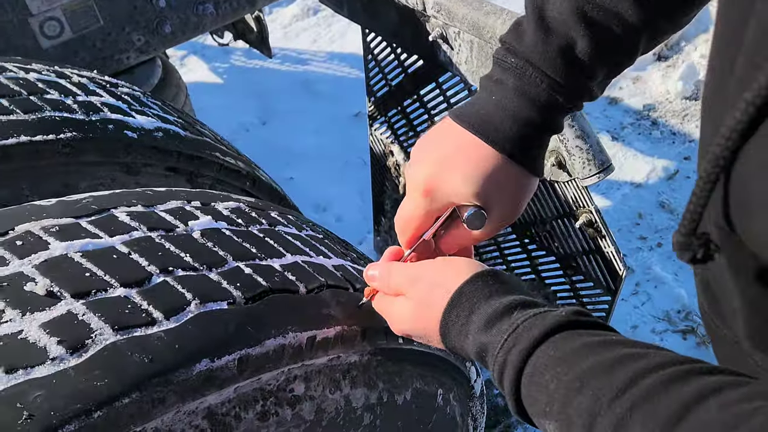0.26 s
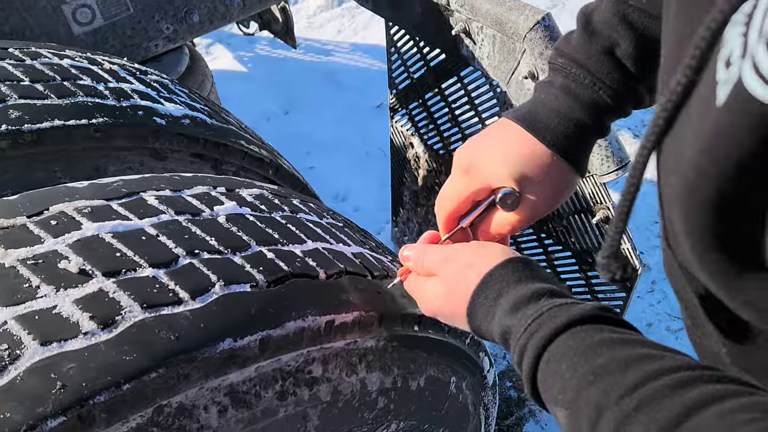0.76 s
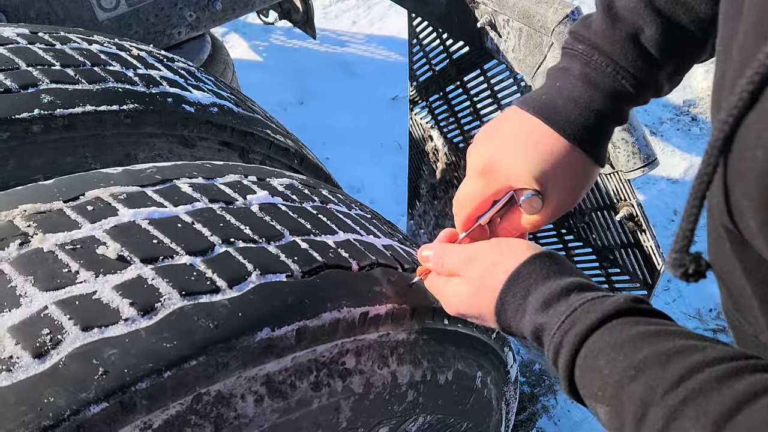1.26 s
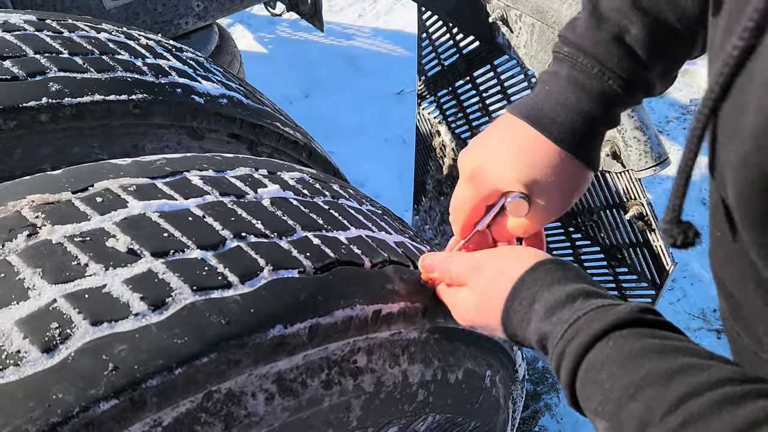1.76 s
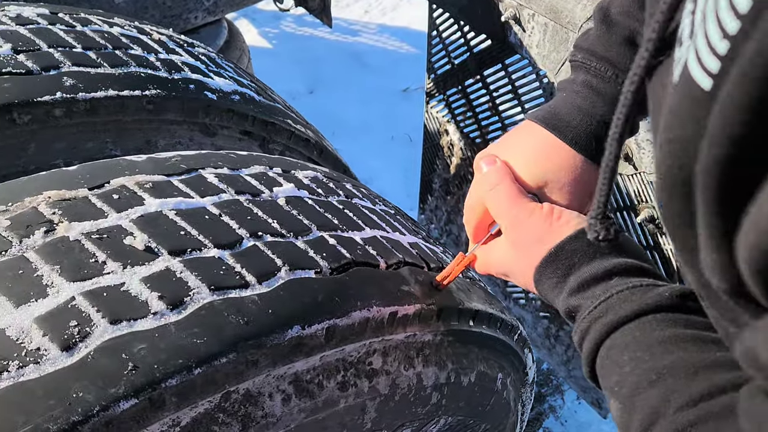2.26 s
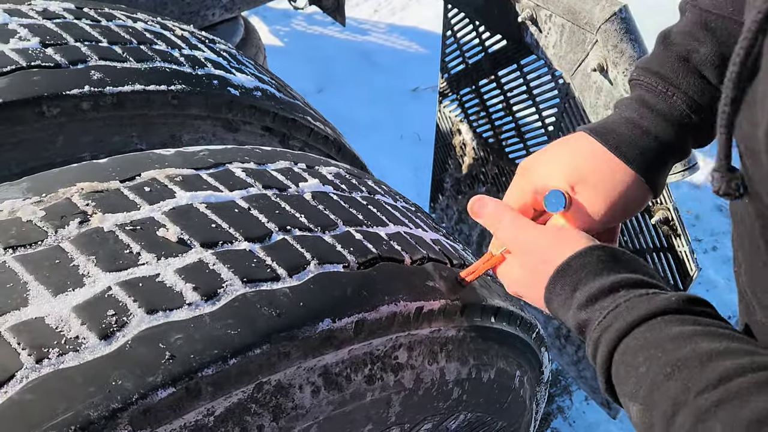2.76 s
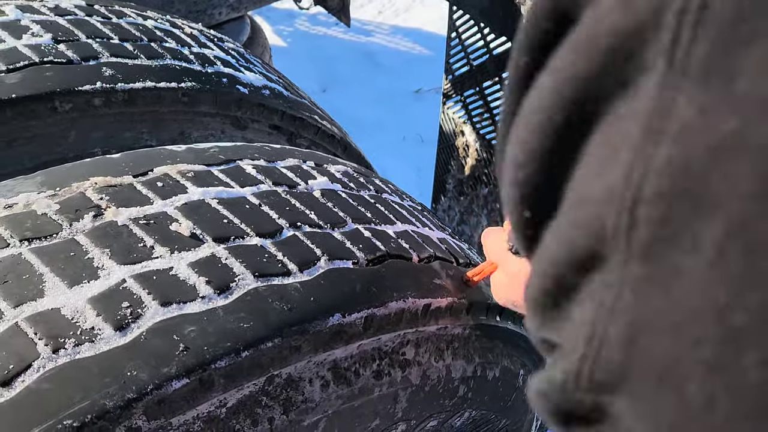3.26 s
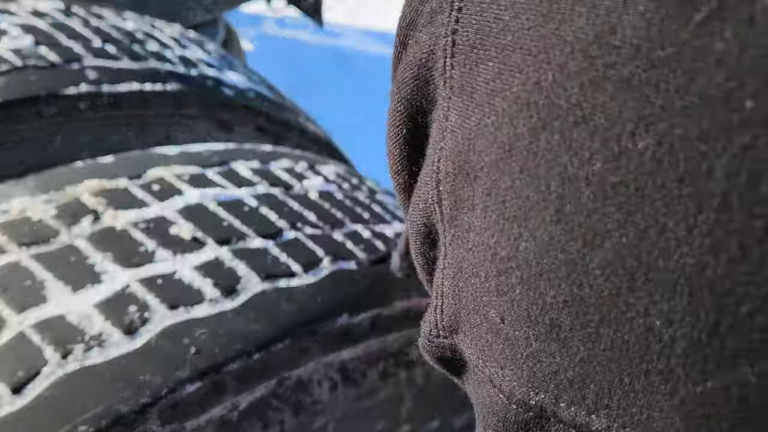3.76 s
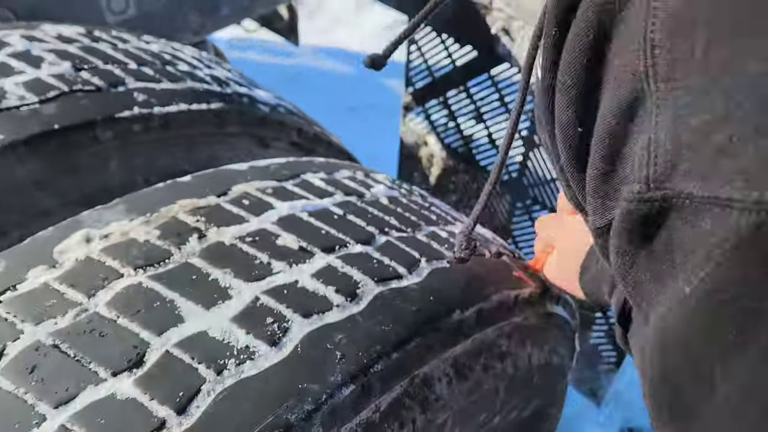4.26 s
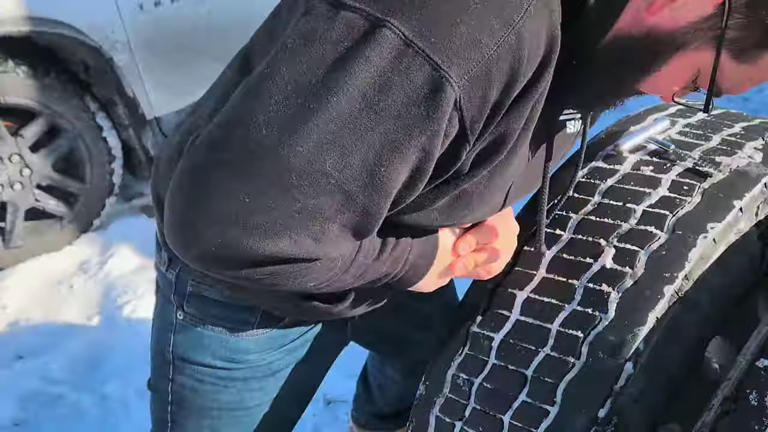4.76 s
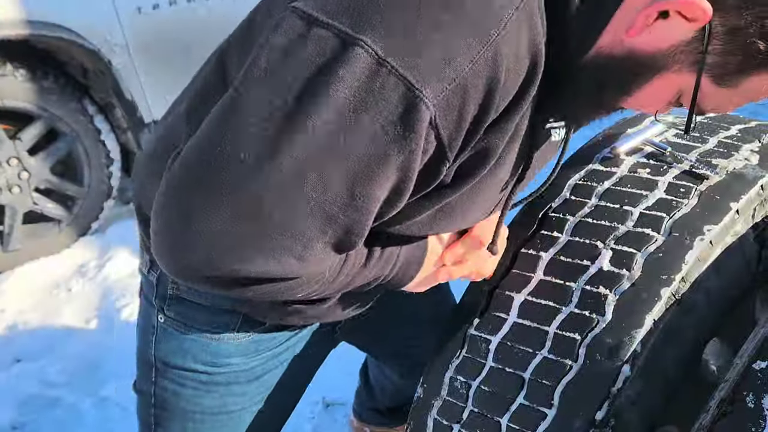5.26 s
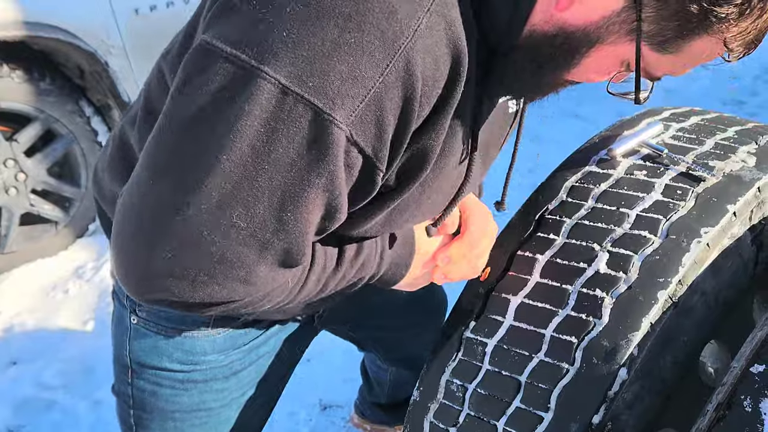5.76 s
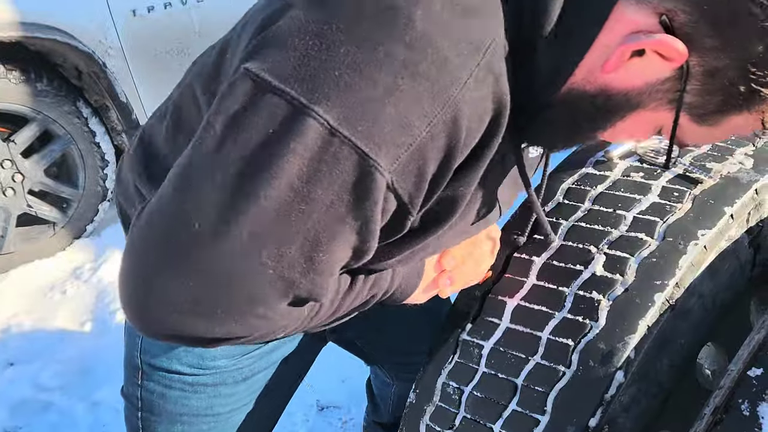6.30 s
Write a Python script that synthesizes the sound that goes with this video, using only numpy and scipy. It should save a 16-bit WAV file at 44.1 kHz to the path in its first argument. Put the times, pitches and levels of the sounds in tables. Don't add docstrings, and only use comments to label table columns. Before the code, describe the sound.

Outdoors, a close, fluctuating tire leak hisses through buffeting wind, fades to nearly nothing, and ends with faint spits, rubbery creaks and sleeve rustle.

```python
import sys
import numpy as np
from scipy import signal
from scipy.fft import rfft, irfft, next_fast_len
from scipy.io import wavfile
from scipy.ndimage import uniform_filter1d, map_coordinates

SR = 44100
rng = np.random.default_rng(int(sys.argv[2]) if len(sys.argv) > 2 else 0)


def field_ratio(decibels):
    return 10 ** (np.asarray(decibels, dtype=float) / 20)


def generate_wav(signal):
    frames = np.transpose(np.atleast_2d(signal))
    scaled = np.clip(frames, -1, 1) * 32767
    pcm = np.round(scaled).astype(np.int16)
    wavfile.write(sys.argv[1], SR, pcm)


N = 288052
TIME = np.arange(N) / SR

# (frequency [Hz], level [dB])
NEAR_RIGHT = [(1000, -1.2), (5000, -1.5), (8000, -9), (12000, -16)]


def unit(x):
    return x / np.sqrt(np.mean(x ** 2) + 1e-20)


def along(points, hz):
    f, v = np.transpose(points)
    return np.interp(np.log(hz + 1), np.log(f + 1), v)


def hump(hz, centre_hz, octaves):
    return np.exp(-(np.log2((hz + 1) / centre_hz) / octaves) ** 2)


def curves(rows):
    s, *cols = np.transpose(rows)
    return [np.interp(TIME, s, c) for c in cols]


def wobble(rate):
    knots = rng.standard_normal(int(N * rate / SR) + 4)
    return map_coordinates(knots, [TIME * rate])


def fade(s):
    return np.clip((TIME - s) / .2 + .5, 0, 1)


def bumps(times, lengths, power):
    distance = np.abs(2 * (TIME - times[:, None]) / lengths[:, None])
    return np.exp(-np.minimum(distance, 3) ** power)


def swells(rows, power):
    s, length, db = np.transpose(rows)
    return db @ bumps(s, length, power)


def add(out, s, piece):
    out[round(s * SR):][:len(piece)] += piece


def filtered(x, response):
    m = next_fast_len(N + 8192)
    return irfft(rfft(x, m) * response(np.fft.rfftfreq(m, 1 / SR)), m)[..., :N]


def rush(spectrum, alike, patchy_db):
    z = signal.stft(rng.standard_normal((2, N)), nperseg=512)[2]
    field = uniform_filter1d(rng.standard_normal(z.shape[1:]), size=5, axis=0)
    field = uniform_filter1d(field, size=12, axis=1)
    pair = signal.istft(z * field_ratio(patchy_db * unit(field)), nperseg=512)[1][:, :N]
    turn = lambda hz: np.arccos(np.clip(along(alike, hz), -1, 1)) / 2
    mid, side = filtered(pair, lambda hz: field_ratio(along(spectrum, hz)) * [np.cos(turn(hz)), np.sin(turn(hz))])
    return unit(np.array([mid + side, mid - side]))


def panned(x, lead_db):
    left, right = field_ratio(lead_db / 2), field_ratio(-lead_db / 2)
    y = x * np.array([left, right]) / np.sqrt(left ** 2 + right ** 2)
    return y / np.sqrt(np.mean(y.mean(0) ** 2))


def jet():
    # (time [s], air flow [dB], slack of the rubber [dB], left lead of the treble [dB])
    gap = [(0, -20.5, -15.5, 6.5), (.6, -23, -9, 11), (.74, -22.5, -16, 11), (1.06, -19, -15.5, 8.5),
           (1.42, -21, -14.5, 9), (1.62, -16.5, -23, 8.5), (1.85, -28, -16.5, 14), (2.25, -25.5, -22.5, 20),
           (2.45, -34.5, -14.5, 23.5), (2.8, -24.5, -14, 8.5), (3.25, -32, 1.5, 24), (3.48, -34, -4, 23.5),
           (4.15, -33.5, -11, 20.5), (4.32, -25.5, -14, 14), (4.55, -31, -10.5, 14),
           (4.72, -38.5, -8, 15.5), (5.26, -48.5, -19.5, 10.5), (5.44, -95, -9, 19.5)]
    # (time [s],
    # length [s], depth [dB])
    pinches = [(.41, .06, 2), (.47, 0.095, 6), (.665, .04, 1), (.71, 0.12, 0), (1.114, 0.078, 4.5),
               (1.46, 0.038, 1), (1.515, 0.095, 8.5), (1.91, .06, -1), (2.36, 0.14, 5.5), (2.5, 0.065, 1.5),
               (2.63, 0.1, -3.5), (2.93, 0.084, 3), (3.17, 0.071, -0.5), (3.5, 0.25, 2.5),
               (3.745, 0.032, 11), (4.04, 0.04, -2.5), (4.19, 0.098, 1.5), (4.76, 0.14, 5), (5.0, .07, 5.5),
               (5.033, 0.023, 17), (5.11, .12, -1.5)]
    # (time [s], length [s],
    # gain [dB])
    spurts = [(.22, .1, 3), (.35, 0.14, 3), (.544, 0.034, 6.5), (.617, 0.013, 7), (.852, 0.054, 10),
              (1.165, 0.068, 4), (1.3, 0.29, 6.5), (1.84, 0.1, 4), (2.04, 0.12, 5), (2.38, 0.14, 6.5),
              (2.547, 0.013, 7.5), (3.0, 0.29, 4.5), (3.033, 0.063, 6), (3.4, 0.14, 4), (3.6, 0.046, -1.5),
              (3.68, 0.045, 2), (3.79, 0.038, 2), (3.86, 0.21, 8.5), (4.02, .05, -0.5), (4.12, .04, 1.5),
              (4.43, .15, -0.5), (4.54, .1, 2.5), (4.65, 0.094, -3.5)]
    # (level over the flow [dB], share of slack, share of a pinch, share of a spurt,
    # extra while fingers cup the hole [dB])
    zones = [
        (0.5, 0.022, 0.75, 0.14, -0.5),
        (-4.5, 0.077, 0.82, 0.38, 4.5),
        (-3.5, 0.43, 0.56, 0.52, 3),
        (0, 1, 0.13, 0.83, -0.5),
    ]
    # (frequency [Hz], level per Hz [dB])
    fizz = [(5600, -33), (9500, -6), (10900, -3), (11800, 2), (12800, 5), (13700, -1.5), (14800, 6),
            (15700, 2), (17000, -2.5)]
    whistle = [(3060, -29), (5200, -19), (5530, -6), (5970, -5), (7420, 2), (9730, -5.5), (10500, -9.5),
               (13600, -35), (22000, -120)]
    body = [(1410, -25), (2400, -7.5), (4050, -0.5), (5040, -2.5), (5530, -3), (5800, -8), (7540, -19),
            (12800, -120)]
    rasp = [(260, -6.5), (450, -10), (572, -3), (931, 1.5), (1110, -3), (1420, 0.5), (1810, -1), (2700, -2),
            (3700, -21), (5940, -120)]
    # (frequency [Hz], left-right likeness)
    alike = [(500, .9), (900, .94), (2000, .86), (4000, .72), (7000, .55), (15000, .55)]
    # (frequency [Hz], level [dB])
    side_on = [(1500, -4), (3000, -1), (5500, -0.5), (6500, -6.5), (7800, -1), (10000, 1), (12500, -1),
               (13800, -1), (15000, 2), (15800, -4)]

    flow_db, slack_db, lead_db = curves(gap)
    flow = field_ratio(flow_db) + field_ratio(1.3 * wobble(35)) * leaks()
    cupped = 1 - fade(1.47)
    pinch_db, spurt_db = swells(pinches, power=3.1), swells(spurts, power=2.34)
    sputter = 0.75 * wobble(9) + 0.82 * wobble(45)
    textures = [(fizz, 1.05, .7), (whistle, .8, .8), (body, .6, .9), (rasp, .15, 1.1)]
    air = 0
    for (db, slack, pinch, spurt, cup_db), (shape, shade, shake_db) in zip(zones, textures):
        opening_db = slack * slack_db - pinch * pinch_db + spurt * spurt_db
        gain = flow * field_ratio(db + opening_db + cup_db * cupped)
        shake = field_ratio(shake_db * sputter + 0.62 * wobble(14))
        air = air + gain * shake * panned(rush(shape, alike, patchy_db=1.4), shade * lead_db)
    air = hands(air)
    turned = fade(4.62)
    return (1 - turned) * air + turned * filtered(air, lambda hz: field_ratio(along(side_on, hz)))


def hands(x):
    # (from [s], left port ahead [rad], cupped-hand resonance [Hz], its level [dB],
    # hollow near 10 kHz [dB])
    postures = [(0, 1.45, 2030, 3, -0.5), (0.651, 1.87, 1480, 2.5, -4), (1.1, 1.15, 3050, 1.5, -5),
                (1.55, 1.06, 2070, -1, -2.5), (1.85, 2.2, 2090, -1.6, -0.5), (2.3, 1.6, 640, 6.5, 4),
                (2.98, 0.91, 1310, 2.5, 4), (3.42, 4.3, 790, 0.5, -4), (3.97, 3.6, 876, 5.5, -8.5),
                (4.22, 0.67, 2110, 4.5, -1.5), (4.6, 0.2, 700, 2.5, -6.5), (5.0, .4, 700, -3, -6)]
    notch_db = [-2.5, -6.5, -3, -3, -5, -5, -3, -1, -3, -3.5, -3, -6]
    # (resonance [Hz], its level [dB], near 14 kHz [dB], near
    # 15 kHz [dB], top edge near 16 kHz [dB])
    treble_rows = [(11500, 0, 3, -0.5, 1), (11700, 2.5, 2, 2, 2.5), (7600, 1.5, -2, 0.8, .3),
                   (7000, 2, -4, -3.5, -4), (7900, 0.5, 1, -2, -11), (5960, 1, 3, -0.5, -3),
                   (7600, 1.5, 1.5, 2, -2.5), (5100, 2, 4, -1, -6), (5400, 5, 6, -3, 1), (5500, 2, 4, 2, 4),
                   (6160, 5.5, 4, -1, 4), (8000, 4.5, 3, -1.5, -1.5)]
    # (band centre [Hz], its level [dB], near 12.5
    # kHz [dB], near 6.5 kHz [dB], near 2 kHz [dB])
    right_rows = [(8000, -1.5, 2, -0.5, .3), (9500, -5.5, -2.5, -4.5, -0.3), (9000, 1, 1.5, -1.8, -2.3),
                  (8250, -6, -1.5, -6, -1), (15200, -5, 1, 6, 6), (11000, -3, 2, 3, 2.5),
                  (11040, -2, 8, 2.5, -5), (11000, -7, 5, -3, -8), (11000, -3, 5, .3, -4),
                  (8600, 5, 3, -5, -0.5), (8000, 2.5, 4, -4, -4), (10000, -5.5, 0.5, 0, 1)]

    starts, ahead, cup_hz, cup_db, hollow_db = np.transpose(postures)[..., None, None]
    peak_hz, peak_db, fourteen_db, crest_db, edge_db = np.transpose(treble_rows)[..., None, None]
    right_hz, right_db, high_db, middle_db, low_db = np.transpose(right_rows)[..., None, None]
    notch = np.reshape(notch_db, cup_db.shape)
    late = rng.uniform(.00015, .0022, (3, len(postures), 2, 1))
    size = rng.choice([-1, 1], late.shape) * field_ratio(-19 + np.array([[0], [5]]))
    left_first, right = np.array([[1], [-1]]), np.array([[0], [1]])

    def response(hz):
        echoes = 1 + (size * np.exp(-2j * np.pi * hz * late)).sum(0)
        first = np.exp(.5j * ahead * hz / (hz + 1400) * left_first)
        colour = cup_db * hump(hz, cup_hz, octaves=0.58)
        colour = colour + hollow_db * hump(hz, 10100, octaves=0.35)
        colour = colour + notch * hump(hz, 2520, octaves=0.12)
        fine_colour = peak_db * hump(hz, peak_hz, octaves=.14)
        fine_colour = fine_colour + fourteen_db * hump(hz, 13900, octaves=.05)
        fine_colour = fine_colour + crest_db * hump(hz, 14900, octaves=.05)
        fine_colour = fine_colour + edge_db * hump(hz, 15900, octaves=.04)
        right_colour = right_db * hump(hz, right_hz, octaves=0.21)
        right_colour = right_colour + high_db * hump(hz, 12400, octaves=0.14)
        right_colour = right_colour + middle_db * hump(hz, 6500, octaves=.3)
        right_colour = right_colour + low_db * hump(hz, 2000, octaves=0.457)
        right_colour = right_colour - 3.5 * hump(hz, 3600, octaves=0.119)
        right_colour = right_colour + 2.5 * hump(hz, 11900, octaves=.05)
        right_colour = right_colour - 2.5 * hump(hz, 15600, octaves=.07)
        return echoes * first * field_ratio(colour + fine_colour + right * right_colour)

    heard = filtered(x, response)
    begun = [np.ones(N)] + [fade(s) for s in starts.ravel()[1:]] + [np.zeros(N)]
    return sum((begun[k] - begun[k + 1]) * y for k, y in enumerate(heard))


def wind():
    # (time [s], buffet level [dB], flutter level [dB], left lead [dB])
    strength = [(0, -22, -33, 0), (.6, -26.5, -35.5, 3.5), (.78, -23, -33, -7), (1.3, -26.5, -42.5, -4),
                (1.75, -26, -45, -6), (2.4, -26, -37.5, -7.5), (2.6, -35.5, -38.5, -6.5),
                (3.4, -35, -37.5, 0.5), (3.95, -34, -45, -11), (4.55, -27.5, -35, -1.5),
                (4.8, -40.5, -45, 0.5), (5.5, -40, -47, -1), (5.9, -43.5, -49.5, -1), (6.1, -34.5, -40, -1),
                (6.53, -28.5, -44.5, -0.5)]
    # (time [s], length [s], gain [dB])
    gusts = [(.16, 0.14, -5), (.3, 0.057, -2), (.39, 0.12, -8), (.7, 0.15, -10.5), (.8, .07, 1.5),
             (1.11, 0.022, 10.5), (1.33, 0.15, -3.5), (1.45, 0.11, 7.5), (1.6, 0.033, 10),
             (1.72, 0.089, -6), (1.843, 0.062, 9), (2.065, 0.048, -16), (2.115, 0.028, 10),
             (2.17, 0.031, -14), (2.333, 0.033, 18.5), (2.48, 0.054, 9), (2.95, 0.31, 7), (3.45, 0.046, -3),
             (3.55, 0.3, 7.5), (3.71, 0.042, 5), (3.88, 0.02, 11.5), (4.175, 0.08, 6.5), (4.3, 0.28, -8),
             (4.55, .12, 0), (5.15, 0.11, 3.5), (5.33, 0.23, -8), (5.99, 0.049, 12), (6.185, 0.14, -8.5),
             (6.33, 0.11, 0), (6.44, .08, -4.5)]
    # (frequency [Hz], level per Hz [dB])
    slow = [(11, -41.5), (18, -10), (43, 1), (64, 2.5), (82, -1), (180, -18), (230, -44.5), (400, -120)]
    quick = [(65, -41.5), (110, -1.5), (205, -9.5), (439, -20.5), (600, -29), (780, -34.5), (1320, -120)]

    buffet_db, flutter_db, lead_db = curves(strength)
    gust_db = swells(gusts, power=2.0)
    lumps = field_ratio(1.6 * wobble(22.095))
    eddies = rush(slow, [(40, 0.93), (90, 1.0), (160, 0.362)], patchy_db=1.5)
    buffet = panned(lumps * eddies, lead_db)
    lumps = field_ratio(1.8 * np.array([wobble(30), wobble(30)]))
    flutter = panned(lumps * rush(quick, [(130, 0.42), (300, 0.2)], patchy_db=2.0), .7 * lead_db)
    steady = field_ratio(buffet_db + gust_db) * buffet + field_ratio(flutter_db + 0.6 * gust_db) * flutter
    thumps, lull = hard_gusts()
    return lull * steady + thumps


def hard_gusts():
    # (time [s], peak [dB], pitch [Hz], length [cycles])
    gust_rows = [(0.495, -16, 54.6, 1.1), (0.785, -16, 55, 0.37), (2.333, -13, 65, 0.84),
                 (2.332, -17, 207, 0.62), (3.61, -18.5, 200, 0.57), (2.693, -17.5, 88.5, 0.34),
                 (4.18, -16, 59, 0.66), (4.512, -13, 65, 0.64), (4.572, -15, 55, 0.97),
                 (6.362, -14, 64, 1.04), (0.279, -24.5, 148, 1.6), (0.619, -17.5, 191, .9),
                 (0.861, -14.5, 160, 0.71), (1.31, -25, 180, 0.67), (4.555, -27, 210, 1.3),
                 (4.621, -31.5, 260, 2.1), (4.656, -33, 230, 2.1), (4.669, -33, 300, 1), (5.18, -28, 60, 1),
                 (6.221, -31, 260, 1.3), (6.291, -32, 300, 1.1), (6.518, -31, 230, 1.3)]
    thumps = np.zeros(N)
    for s, db, hz, cycles in gust_rows:
        swell = np.exp(-((TIME - s) * hz / cycles) ** 2 * 2)
        thumps += field_ratio(db - 3.0) * swell * np.sin(2 * np.pi * hz * (s - TIME) + 1.4)
    s, _, hz, cycles = np.transpose(gust_rows)
    lull = 1 - 0.5 * bumps(s, 1.27 * cycles / hz, power=4.7).max(0)
    return thumps * field_ratio([[-.7], [.6]]), lull


def yard():
    # (frequency [Hz], level per Hz [dB])
    spectrum = [(240, -44.5), (400, -18.5), (800, -12), (1300, -17.5), (2250, -17.5), (2450, -30),
                (2900, -29), (3300, -25.5), (5000, -28.5), (6500, -28), (8000, -32.5), (9500, -46),
                (15800, -64)]
    # (frequency [Hz], level [dB])
    facing_away = [(1000, 3.2), (4000, 3.5), (7000, -3), (9000, -8.5), (15800, -10)]
    air = rush(spectrum, [(600, 0.18), (3000, .3), (8000, .15)], patchy_db=2.5)
    hum = field_ratio(-59.5 + 0.27 * wobble(2.1)) * panned(air, np.full(N, 1.5))
    hum[1] = filtered(hum[1], lambda hz: field_ratio(along(facing_away, hz)))
    return hum


def gap_clicks():
    # (time [s], peak [dB])
    snaps = [
        (2.552, -25),
        (5.0183, -32),
        (5.0453, -35),
        (5.686, -43),
        (5.8555, -36),
        (6.02, -39),
        (6.082, -46),
    ]
    out, t = np.zeros(N + SR), TIME[:SR // 20]
    for s, db in snaps:
        add(out, s, field_ratio(db - 60 * t / .006) * uniform_filter1d(rng.standard_normal(len(t)), size=3))
    return out[:N]


def creaks():
    # (time [s], peak [dB], pitch [Hz], time to fall 60 dB [s], snap [dB])
    creak_rows = [(3.762, -27.5, 780, 0.03, -10), (4.485, -27, 1450, .012, -10),
                  (4.499, -31, 600, 0.0078, -12), (4.537, -26.5, 810, 0.02, -9),
                  (4.584, -22, 960, 0.0098, -8), (4.638, -33, 564, 0.021, -15),
                  (4.648, -45, 600, 0.012, -15), (4.661, -36, 660, 0.016, -15),
                  (4.672, -35, 700, 0.014, -15), (4.707, -40, 527, 0.045, -6),
                  (4.717, -38.5, 705, 0.013, 2), (4.758, -42, 568, 0.023, -6),
                  (5.681, -41, 560, 0.022, -18), (5.897, -41.5, 880, 0.024, -9),
                  (6.217, -43, 554, 0.018, -30), (6.273, -41, 1700, 0.011, -20),
                  (6.29, -38, 900, 0.011, -25), (6.304, -43, 940, 0.02, -22),
                  (6.343, -35.5, 676, 0.022, -29), (6.381, -35, 815, 0.023, -28),
                  (6.391, -35, 800, 0.03, -31), (6.397, -38, 1000, 0.014, -24),
                  (6.415, -27.5, 725, 0.019, -35), (6.435, -41.5, 1400, 0.013, -21),
                  (6.452, -42, 1100, .012, -18), (6.469, -35, 1900, .01, -18), (6.475, -42, 1500, .01, -16),
                  (6.48, -29.5, 910, 0.019, -20), (6.489, -36, 804, 0.016, -22),
                  (6.497, -41, 1100, .015, -16), (6.503, -42, 900, .012, -16),
                  (6.519, -45, 977, 0.018, -14)]
    # (from [s], to [s], rate [grains/s], level [dB])
    scrapes = [
        (4.478, 4.787, 130, -52),
        (5.86, 5.95, 130, -51),
        (6.22, 6.331, 600, -50),
        (6.332, 6.529, 1000, -48),
    ]
    out, t = np.zeros(N + SR), TIME[:SR // 20]
    slips = list(creak_rows)
    for start, end, rate, db in scrapes:
        for a, b, c in rng.random((int((end - start) * rate), 3)):
            pitch_hz = 620 * 3.5 ** (c * c)
            slips.append((start + a * (end - start), db + 12 * (b - .5), pitch_hz, .012, -24))
    for s, db, hz, t60, snap_db in slips:
        drift = np.cumsum(rng.standard_normal(len(t))) * 0.14
        phase = 2 * np.pi * hz * t + drift
        ring = sum(field_ratio(level) * np.sin(k * phase) for k, level in [(1, 9), (1.45, -20), (2.4, -8)])
        ring = ring * field_ratio(-60 * t / t60) * (1 - np.exp(-t / 0.0009)) ** 2
        snap = uniform_filter1d(np.diff(rng.standard_normal(len(t) + 1)), size=3)
        snap = snap * field_ratio(snap_db + 9 - 60 * t / .01)
        add(out, s, field_ratio(db - 5.0) * (ring + snap))
    return out[:N]


def engine_ticks():
    out, t = np.zeros(N + SR), TIME[:SR // 20]
    ping = np.sin(2 * np.pi * 5500 * t) + .22 * np.sin(2 * np.pi * 6300 * t)
    ping = ping * field_ratio(-60 * t / .03) * (1 - np.exp(-t / .0015))
    times = np.arange(4.6725, N / SR, 1 / 16.0)
    for s, (size, late) in zip(times, rng.standard_normal((len(times), 2))):
        add(out, s + .0006 * late, field_ratio(-59 - 6 * (s - 5.4) + 2 * size) * ping)
    return out[:N] * field_ratio([[1.5], [-7]])


def leaks():
    # (start [s], hold [s], flow [dB])
    leak_rows = [
        (5.55, .05, -78.5),
        (5.61, 0.019, -60),
        (5.676, 0.057, -58.5),
        (5.74, 0.12, -55.5),
        (5.87, 0.089, -60),
        (5.98, .07, -67),
        (6.29, .03, -80),
        (6.36, .02, -79),
        (6.4, .04, -75),
        (6.462, 0.076, -67),
    ]
    flow = np.zeros(N)
    for s, hold, db in leak_rows:
        rise = np.clip((TIME - s) / .015, 0, 1)
        flow += rise * field_ratio(db - 307 * np.maximum(TIME - s - hold, 0))
    return flow


def scuff():
    # (time [s], length [s], from pitch [Hz], to pitch [Hz], level [dB])
    slip = (6.014, .065, 667, 460, -47.5)
    out = np.zeros(N + SR)
    s, length, from_hz, to_hz, db = slip
    u = np.arange(int(length * SR)) / (length * SR)
    turns = np.cumsum(from_hz + (to_hz - from_hz) * u) / SR
    turns = turns + np.cumsum(rng.standard_normal(len(u))) * 0.011
    add(out, s, field_ratio(db) * np.sin(np.pi * np.sqrt(u)) * np.sin(2 * np.pi * turns))
    return out[:N]


def sleeve():
    # (frequency [Hz], level per Hz [dB])
    spectrum = [(1500, -30), (3000, -2), (5000, 0.7), (7500, -3.5), (11000, -17.5), (15800, -26)]
    # (time [s], level [dB])
    moves = [(6.2, -93.5), (6.27, -67), (6.33, -64), (6.36, -70), (6.4, -65), (6.44, -66), (6.49, -57),
             (6.53, -60)]
    level_db, = curves(moves)
    cloth = field_ratio(level_db + 4 * wobble(150)) * rush(spectrum, [(3000, .5)], patchy_db=3.5)
    return np.array([cloth[0], filtered(cloth[1], lambda hz: field_ratio(along(NEAR_RIGHT, hz) - 6.0))])


def at_ports(x):
    return np.array([field_ratio(3.7) * x, filtered(x, lambda hz: field_ratio(along(NEAR_RIGHT, hz)))])


def scene():
    tool = at_ports(gap_clicks() + creaks() + scuff())
    return jet() + wind() + yard() + tool + engine_ticks() + sleeve()


def band_limit(x):
    return signal.sosfilt(signal.butter(12, 17110, fs=SR, output="sos"), x)


def record(dry):
    rounded = dry / (1 + np.abs(dry / .95) ** 6) ** (1 / 6)
    edge = lambda hz: np.sin(np.pi / 2 * np.clip((15880 - hz) / 160, 0, 1)) ** 2
    return band_limit(filtered(rounded, edge))


dry = scene()
out = record(dry)
generate_wav(out)
```